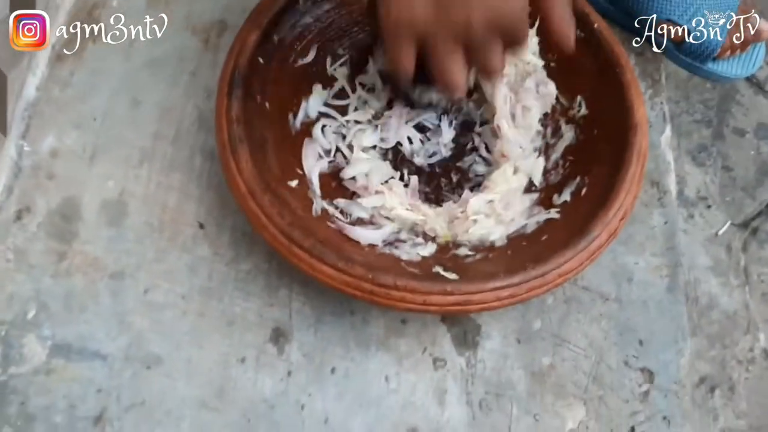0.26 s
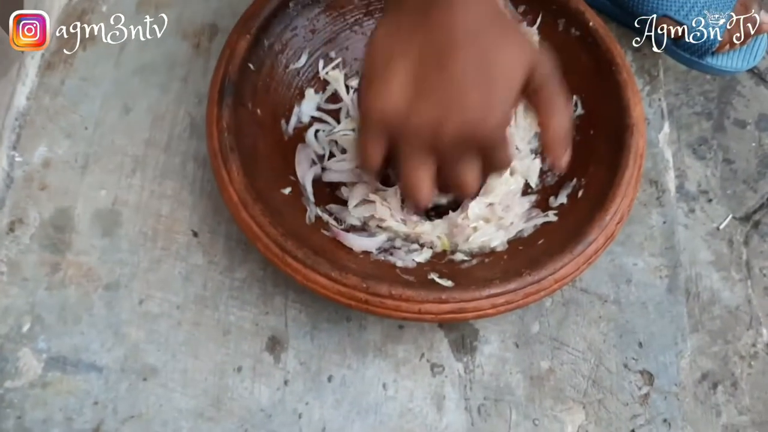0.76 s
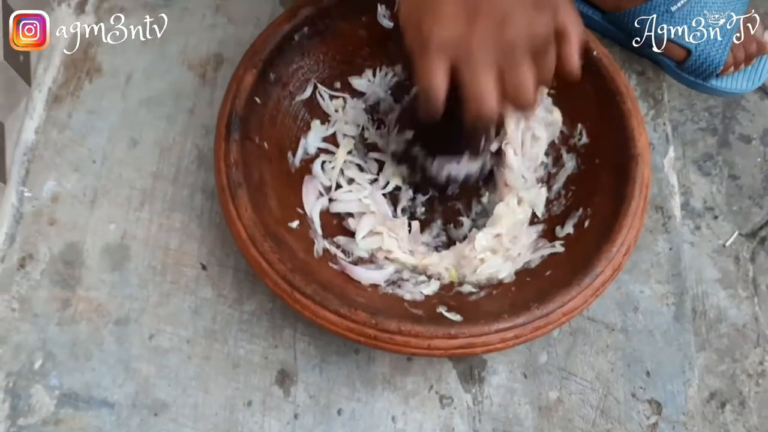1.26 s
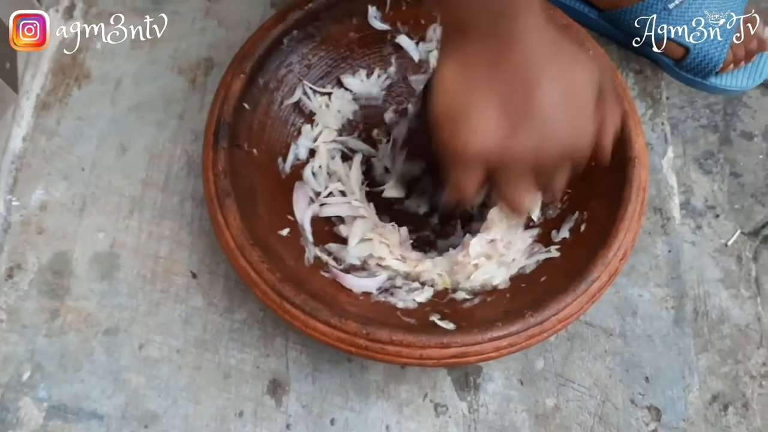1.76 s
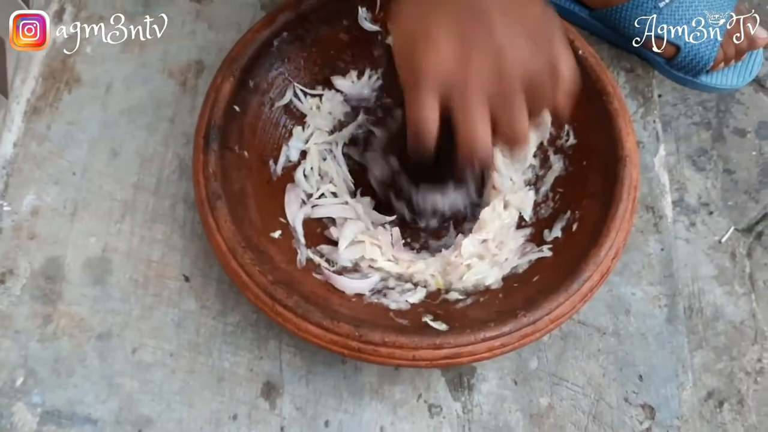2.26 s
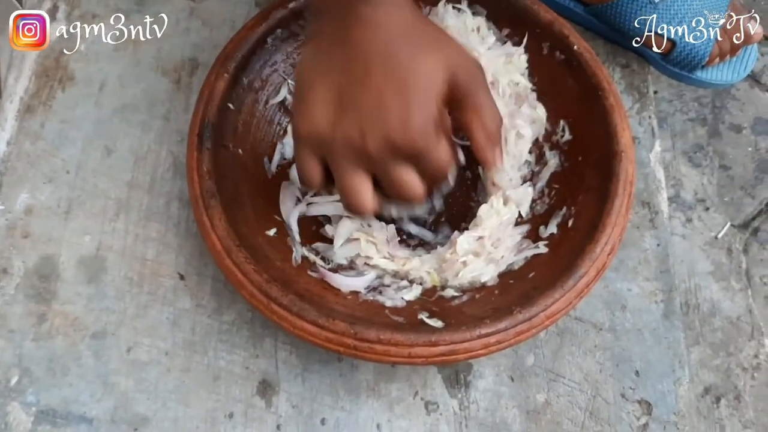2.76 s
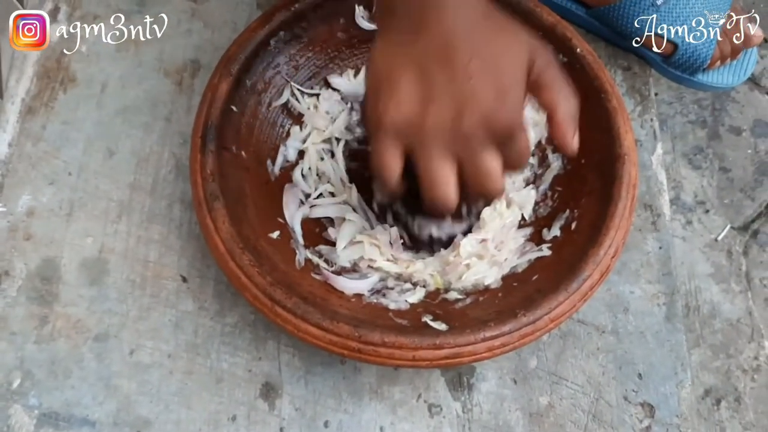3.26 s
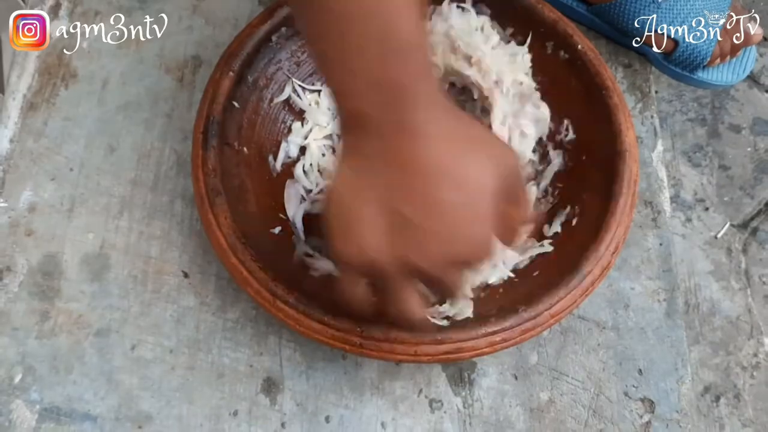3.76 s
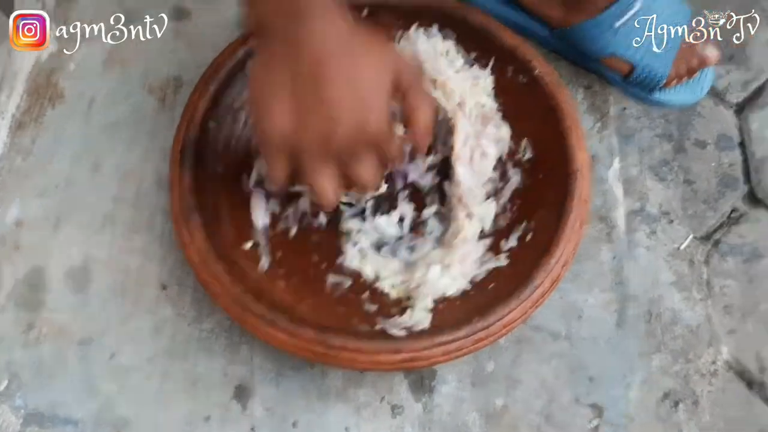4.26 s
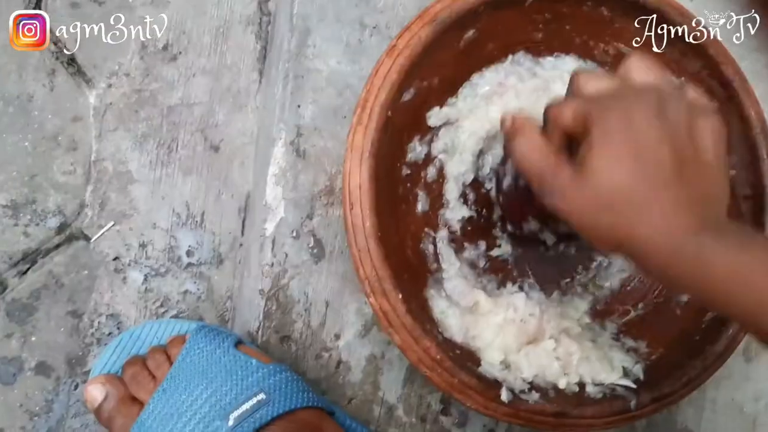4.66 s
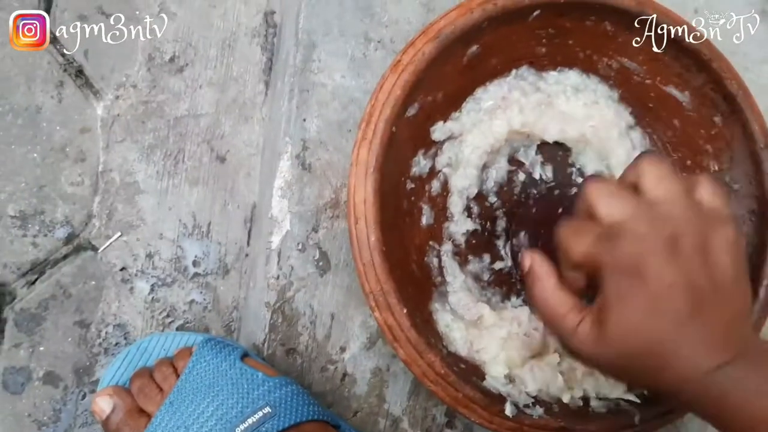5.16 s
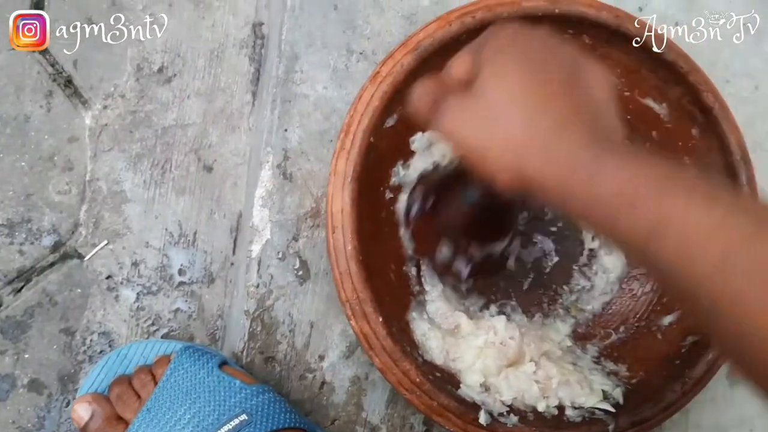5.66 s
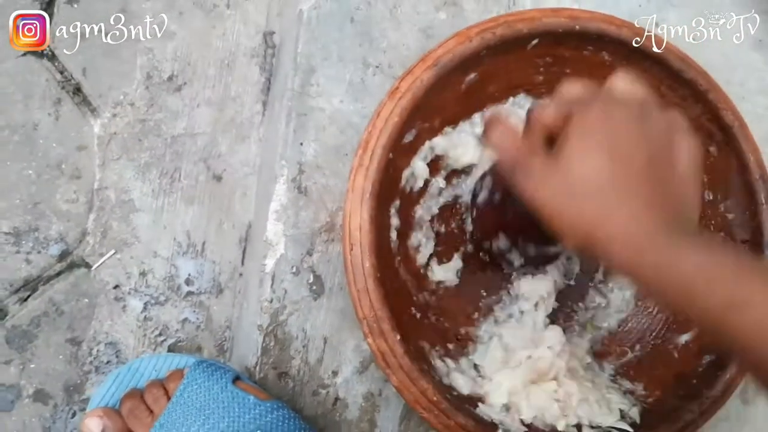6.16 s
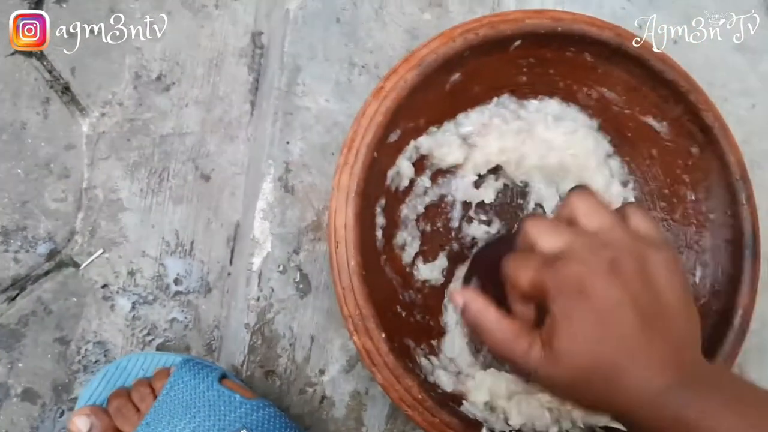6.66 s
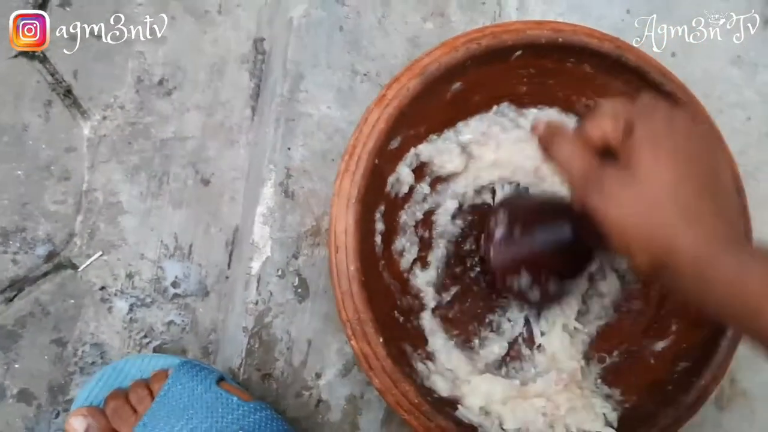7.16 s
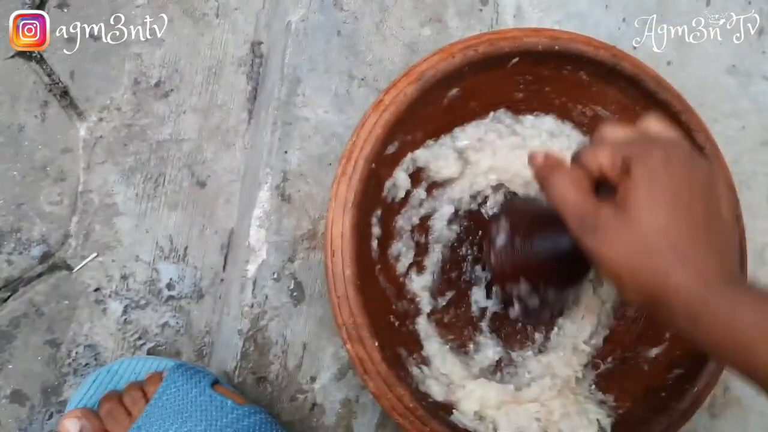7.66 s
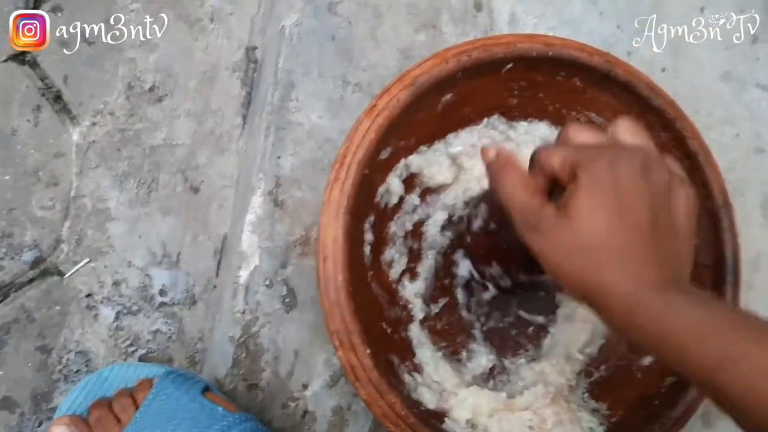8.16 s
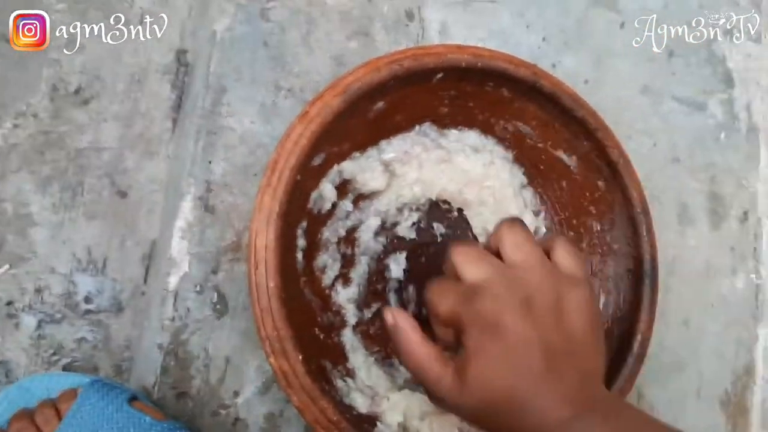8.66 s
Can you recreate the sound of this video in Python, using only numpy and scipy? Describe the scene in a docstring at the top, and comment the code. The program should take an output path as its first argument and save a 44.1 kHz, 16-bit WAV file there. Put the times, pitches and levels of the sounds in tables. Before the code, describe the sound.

Close outdoor grinding: a wooden pestle strikes a heavy grooved clay bowl in quick, uneven hollow knocks, many with a small double bounce. Between them it drags over the ridges with a gritty, crunchy scrape. Around the middle the sound cuts to wet paste, with slightly higher, shorter knocks, sharp snaps and thin spitting ticks. Very faint low air behind, dry, with a loose stereo spread.

```python
"""Hard, hollow knocks stand out throughout: a wooden pestle circles in a grooved clay bowl on concrete.
Every blow rings a few damped modes of the bowl and may bounce; the pestle also drags over the
grooves, heard as random grains coloured by clay and food, with snaps and low groans.
From 4.43 s the food is a wet paste that also spits. Faint air lies behind.
The right channel arrives a few ms early or late, and the offset jumps from stroke to stroke."""
import sys
import numpy as np
from scipy import signal
from scipy.fft import rfft, irfft, next_fast_len
from scipy.io import wavfile
from scipy.ndimage import uniform_filter1d

SR = 44100
rng = np.random.default_rng(int(sys.argv[2]) if len(sys.argv) > 2 else 0)


def unload_audio(sound):
    """Save the sound as a 16-bit wav file, at the path given as the first command line argument."""
    columns = np.transpose(np.atleast_2d(sound))
    # keep every value between -1 and 1, then stretch to whole-number steps
    steps = np.round(np.clip(columns, -1, 1) * 32767)
    wavfile.write(sys.argv[1], SR, steps.astype(np.int16))


def magnitude_from_level(level_db):
    """Linear magnitude for a level in decibels (20 dB per decade)."""
    exponent = np.asarray(level_db, float) / 20
    return 10 ** exponent


N = 393372
PASTE_FROM_S = 4.43  # chopped food before, wet paste after


def evened(x):
    """Normalisation: scales to rms 1."""
    return x / np.sqrt(np.mean(x ** 2) + 1e-20)


def colour(x, points):
    """Linear filtering: multiplies the spectrum by a curve through (Hz, dB) points."""
    hz, db = np.transpose(points)
    size = next_fast_len(x.shape[-1])
    f = np.fft.rfftfreq(size, 1 / SR)
    gain = magnitude_from_level(np.interp(np.log(f + 1), np.log(hz), db))
    return irfft(rfft(x, size) * gain, size)[..., :x.shape[-1]]


def add(mix, s, sound):
    """Superposition: mixes a sound in at s seconds."""
    part = mix[..., round(s * SR):][..., :sound.shape[-1]]
    part += sound[..., :part.shape[-1]]


def ring(modes, t):
    """Modal decay: after one blow each mode is a sine that dies away exponentially."""
    return sum(magnitude_from_level(db - 60 * t / t60) * np.sin(2 * np.pi * hz * t) for hz, db, t60 in modes)


# blows on the wall: start_s, peak_db (before the bass cut), pitch_hz (main mode under the hand's load),
# upper_db (other modes, before a common cut), right_late_ms (lag of the right channel)
BLOWS = [(0.017, -1, 336, 7, 8.5), (0.24, -1, 313, -3, 8), (0.332, 5, 324, 2, 8.5), (0.431, 3, 336, -6, 8),
         (0.531, -11.5, 286, 7, 7), (0.632, 4.5, 304, 2, 5.5), (0.75, -9.5, 270, -5, 6.5),
         (0.833, -6, 300, -3.5, 4), (0.953, 1.5, 298, 2, 4.5), (1.128, -16.5, 313, -6, 5),
         (1.246, -5, 339, -2, 2), (1.469, -8, 295, -3, -3.5), (1.759, -10.5, 320, -6, 3.5),
         (1.87, -3, 305, 3, 6), (2.096, -6.5, 312, -2.5, 2.05), (2.212, -4, 343, 1.5, 4.5),
         (2.394, -8, 332, -8, 1.5), (2.528, -3, 338, 0, 5), (2.724, -6.5, 328, -17, 2),
         (2.836, -6, 301, -5.5, -1), (3.053, -5.5, 318.5, -12.5, 3.5), (3.148, -12.5, 307, 2.5, 0.5),
         (3.344, -5.5, 306, -7, 11.5), (3.483, 3, 322, -5.5, 5), (3.66, -2.5, 314.6, -7, -2.5),
         (3.858, -12, 358, -9, 5), (3.892, 4, 306, -1.5, 5), (4.082, 7.5, 316, -4.5, 5.5),
         (4.603, -10, 383, -3, 4.5), (4.904, -10.5, 371, -5, 2.9), (5.197, -6, 377, 0.5, -2),
         (5.478, -9, 371, -4, -0.15), (5.783, -11, 389, -4, -1.5), (5.991, -20, 336, -14.5, 0.5),
         (6.141, -6.5, 372, -2, 5), (6.403, -11.5, 385, -5.5, 0.06), (6.66, -6.5, 396, -11, 2),
         (6.882, -9, 320, -3, 7.5), (6.948, -2, 376, -4.5, 0.17), (7.13, -18, 340, -15, 2),
         (7.242, -4, 379, -2.5, 0.73), (7.423, -6.5, 335, -14.5, 8), (7.538, -8.5, 373, -5, 2.5),
         (7.814, -9, 393, -2.5, 5), (8.108, -7.5, 370, -1.5, -2.5), (8.286, -17, 348, -17, 7.5),
         (8.405, -9, 386, 2, 4.5), (8.709, -7, 384, -4, 6)]
# landings after a blow, on the same loaded bowl: start_s, peak_db (before the bass cut)
BOUNCES = [(0.035, -3), (0.266, -2.5), (0.281, -10), (0.458, -2.5), (0.648, 2.5), (0.966, -8.5),
           (1.486, -4.5), (1.881, 6), (1.899, -4.5), (2.226, -11.5), (2.545, 1), (2.85, -0.5), (3.079, -23),
           (3.163, -5.5), (3.518, -17), (3.688, -13), (3.704, -3), (3.913, -3), (3.923, -1.5), (4.123, -5),
           (4.617, -10), (4.92, -19), (5.214, -2), (5.801, -4), (6.042, -4), (6.057, -4.5), (7.264, -12),
           (7.827, -10), (8.584, -26), (8.724, -16)]
# the other modes of the bowl: pitch_hz, level_db, t60_s
BOWL_MODES = [(269.3, -10, 0.2), (533.2, 0.5, 0.042), (603.6, -9, 0.062), (661, -11, 0.12), (748, -3, 0.06),
              (847, -6, 0.019), (1012, -17, 0.12), (1544, -12.5, 0.022), (1846, -5.5, 0.021)]


def knocks():
    """Impact excitation: soft wood pushes the wall for about a millisecond, then chatters; the bowl rings."""
    t, out = np.arange(SR // 5) / SR, np.zeros(N)
    blows = np.array(BLOWS)
    hits = [row[:2] for row in BLOWS] + BOUNCES
    spots = rng.standard_normal((len(hits), 3, len(BOWL_MODES)))
    chatter_shape = magnitude_from_level(-32 - 60 * t / 0.17) * np.minimum(t / 0.0083, 1)
    forces = rng.standard_normal((len(hits), len(t))) * chatter_shape
    forces[:, 0] = 1  # the first push
    for (s, db), (detune, share, side), force in zip(hits, spots, forces):
        latest = np.searchsorted(blows[:, 0], s, "right") - 1
        low_hz, upper_db = BLOWS[latest][2:4]
        damp = 0.7 if s > PASTE_FROM_S else 1  # paste deadens the main mode
        low = ring([(low_hz, 0, 0.099 * damp), (low_hz * 1.1, -13, 0.087 * damp)], t)
        low = low * (1 - np.exp(-t / 0.0017))  # the whole bowl needs a few ms to start rocking
        # each spot on the wall has its own mix, tuning and signs of the modes
        modes = [(np.sign(c) * hz * (1 + 0.02 * a), d + 2.5 * b, t60)
                 for (hz, d, t60), a, b, c in zip(BOWL_MODES, detune, share, side)]
        upper = magnitude_from_level(upper_db - 3.5) * ring(modes, t)
        push = np.hanning(round(0.00075 * magnitude_from_level(-0.2 * db) * SR) + 3)  # harder blows touch more briefly
        blow = signal.fftconvolve(low + upper, np.convolve(force, push))[:len(t)]
        add(out, s - 0.002, magnitude_from_level(db) * blow / abs(blow).max())  # 2 ms lead for the blow to build up
    # too small a body to radiate bass
    return signal.sosfilt(signal.butter(2, 200, "high", fs=SR, output="sos"), out)


# sweeps over the grooves: start_s, stop_s, start_grit_db, stop_grit_db, crackle_over_grit_db
# (levels before rise, squeeze and texture)
SWEEPS = [(0, 0.022, 2, -34.5, -2.5), (0.214, 0.353, -38.5, -33, -7), (0.425, 0.65, -38, -34.5, -10.5),
          (0.698, 0.954, -40.5, -35, -10.5), (1.044, 1.279, -39, -36.5, -6),
          (1.339, 1.595, -40.5, -33, -8.5), (1.664, 1.889, -43.5, -30.5, -9.5), (1.967, 2.2, -44, -33, -8),
          (2.297, 2.547, -39.5, -34, -11.5), (2.62, 2.872, -43.5, -34.5, -8),
          (2.915, 3.122, -47.5, -30.5, -10), (3.142, 3.262, -31.5, -49, -10.5),
          (3.245, 3.476, -47.5, -35.5, -6), (3.626, 3.934, -41.5, -40, -2.5),
          (4.055, 4.33, -45.5, -39, -5.5), (4.428, 4.636, -45.5, -32, -2.5), (4.705, 4.788, -48, -34.5, 0),
          (4.831, 4.933, -46.5, -29, -5), (5.002, 5.226, -39, -36, -3), (5.256, 5.484, -39, -33.5, -7.5),
          (5.562, 5.766, -43, -30, -10.5), (5.906, 6.145, -40.5, -32, -8.5), (6.199, 6.332, -47, -42.5, -3),
          (6.321, 6.417, -47.5, -34, -2.5), (6.554, 6.691, -42.5, -31, -7),
          (6.719, 6.969, -40.5, -31.5, -8.5), (7.022, 7.283, -41, -35, -4.5), (7.313, 7.43, -35.5, -33, -5),
          (7.42, 7.547, -31, -32, -7), (7.6, 7.736, -37.5, -32, -8.5), (7.784, 7.822, -35, -29, -1),
          (7.888, 7.99, -37.5, -33.5, -9), (7.993, 8.137, -44, -28.5, -8.5), (8.2, 8.315, -37, -35.5, -6.5),
          (8.35, 8.417, -53, -28, -6), (8.475, 8.584, -50.5, -32, -3), (8.58, 8.73, -47, -32.5, -4),
          (8.78, 8.93, -52, -30, -3)]
# the pestle's mere weight between sweeps, a row for grit and a row for crackle: level_db
REST_LEVELS = [
    [-56],
    [-59],
]


def pressure():
    """Friction follows load: grit and crackle swell along most sweeps, fade along a few, die away after."""
    grit_rise_s, grit_fall_db_per_s = 0.034, 262
    crackle_rise_s, crackle_fall_db_per_s = 0.033, 470
    t = np.arange(0, N + 64, 64) / SR
    power = magnitude_from_level(REST_LEVELS) ** 2
    for start, stop, start_db, stop_db, food_db in SWEEPS:
        since, after = np.maximum(t - start, 0), np.maximum(t - stop, 0)
        db = np.interp(t, [start, stop], [start_db, stop_db])
        grit = magnitude_from_level(db - grit_fall_db_per_s * after) * np.minimum(since / grit_rise_s, 1) ** 2
        # extra crackle as the food is squeezed against the wall towards the stop
        squeeze_db = 5.5 * np.exp(-np.maximum(stop - t, 0) / 0.17)
        food = magnitude_from_level(db + food_db + squeeze_db - crackle_fall_db_per_s * after)
        food = food * np.minimum(since / crackle_rise_s, 1) ** 2
        power = power + np.array([grit, food]) ** 2
    return [np.interp(np.arange(N) / SR, t, np.sqrt(p)) for p in power]


def grains(per_s, spread_db, clump_db, shared):
    """Shot noise: random clicks of uneven size in clumps of about 3 ms; the two ports share a part."""
    size_db = spread_db * np.minimum(rng.exponential(1, (3, N)), 4)
    size = magnitude_from_level(size_db) * rng.standard_normal((3, N))
    clicks = size * (rng.random((3, N)) < per_s / SR)
    clumps = evened(uniform_filter1d(rng.standard_normal(N), size=130))
    both = shared * clicks[0] + np.sqrt(1 - shared ** 2) * clicks[1:]
    return evened(both * magnitude_from_level(clump_db * clumps))


def patchy(x, db):
    """Spectral modulation: parts of the spectrum swell and fade as the pestle meets other clay and food."""
    z = signal.stft(x, nperseg=512)[2]
    patches = uniform_filter1d(rng.standard_normal(z.shape[1:]), 5, 0)
    patches = uniform_filter1d(patches, 7, 1)
    return signal.istft(z * magnitude_from_level(db * evened(patches)), nperseg=512)[1][:, :N]


# colour of the grit in chopped food, then in paste: pitch_hz, level_db (per Hz, relative)
GRIT_CHOPPED = [(45, -13), (150, -1), (320, -0.5), (500, -9), (1200, -22), (1700, -5.5), (2300, -7),
                (4500, -17), (6000, -24.5)]
GRIT_PASTE = [(45, -12), (150, 0.5), (350, 7), (550, -4), (1100, -5), (1800, -0.5), (2700, -1),
              (4500, -14.5), (6000, -19)]
# colour of crackling food, in drag and snaps: pitch_hz, level_db (per Hz, relative)
CRACKLE = [(3000, -3), (5000, 5.5), (7800, 2.5), (9800, -5.5), (11600, -0.5), (13500, -7), (16000, -41)]


def drag():
    """Source and resonator: grit excites the clay and its top modes; the food crackles above it."""
    on_grit, on_food = pressure()
    t = np.arange(N) / SR
    grit = grains(per_s=4500, spread_db=1.5, clump_db=2.5, shared=0.66)
    top_ring = ring(BOWL_MODES[-2:], t[:SR // 8])
    sung = evened(signal.oaconvolve(grit, top_ring[None], axes=1)[:, :N])
    chopped = magnitude_from_level(4) * evened(colour(grit, GRIT_CHOPPED)) + magnitude_from_level(-0.5) * sung
    paste = magnitude_from_level(5) * evened(colour(grit, GRIT_PASTE))
    rub = patchy(np.where(t < PASTE_FROM_S, chopped, paste), db=2.5)
    food = colour(grains(per_s=3000, spread_db=3.5, clump_db=4.5, shared=0.76), CRACKLE)
    paste_top = colour(food, [(9000, -34), (13500, 6.5)]) * (t > PASTE_FROM_S)  # paste spits higher
    food = patchy(evened(food + paste_top), db=2.2)
    return rub * on_grit + food * on_food


# single snaps of food: start_s, level_db (rms of the burst before it fades),
# treble_over_middle_db, length_ms (time to fall 14 dB)
SNAPS = [(0.652, -19, 3, 6.6), (0.815, -25.5, 23, 6.8), (1.572, -25.5, 27, 13), (2.498, -26.5, 20, 16),
         (1.2584, -20.5, 2, 5.9), (4.241, -24, -8, 17), (0.915, -19.5, 13, 4.2), (2.439, -17.5, -27, 5.5),
         (3.844, -16.5, -34, 5.1), (4.604, -15.5, 29, 15), (4.912, -18.5, -1, 13), (5.212, -12.5, 30, 7.8),
         (5.799, -16, -12, 14), (6.138, -5.5, -31, 9.8), (6.944, -13.5, 12, 5.1), (7.147, -16.5, -33, 4),
         (7.256, -5, 25, 6.8), (7.541, -18.5, 4, 8.1), (8.425, -13.5, 2, 4.4)]


def snaps():
    """Brittle fracture: a short burst made of a clack at two tones of the clay and a treble spit."""
    out, t = np.zeros(N), np.arange(2048) / SR
    clay = [(1800, -42), (2650, -15.5), (3050, -22), (3450, -15.5), (4500, -44)]
    for (s, db, treble_db, ms), noise in zip(SNAPS, rng.standard_normal((len(SNAPS), 2048))):
        middle = evened(colour(noise, clay))
        spit = colour(noise, CRACKLE)
        spit = spit + (s > PASTE_FROM_S) * colour(spit, [(9000, -4), (12500, 6)])  # paste spits higher
        burst = middle + magnitude_from_level(treble_db) * evened(spit)
        fading_db = -14 * t * 1000 / ms
        add(out, s, magnitude_from_level(db + fading_db) * burst / burst.std() * np.minimum(t / 0.00005, 1))
    return out


# thin spits of paste: start_s, level_db (before a common 1 dB cut, rise and decay)
SPITS = [(4.5845, -9), (4.884, -9.5), (5.0667, -13.5), (5.1782, -10), (5.7417, -15.5), (5.8832, -13.5),
         (6.304, -11), (6.6703, -13), (7.7803, -18), (7.8177, -17), (8.256, -14.5), (8.408, -17),
         (8.6938, -11.5)]


def spits():
    """Bubble burst: paste gives way in a click of a few ms, brightest at the top."""
    out, t = np.zeros(N), np.arange(1024) / SR
    for (s, db), noise in zip(SPITS, rng.standard_normal((len(SPITS), 1024))):
        burst = evened(colour(noise, [(1500, -9), (5000, -8), (10000, -10.5), (13000, 0.5)]))
        add(out, s, magnitude_from_level(db - 1 - 60 * t / 0.025) * burst * np.minimum(t / 0.0013, 1))
    return out


# low shudders: start_s, length_s, peak_db, from_hz, to_hz
GROANS = [(0.298, 0.07, -21, 110, 45), (1.206, 0.2, -35.5, 100.5, 88), (1.493, 0.118, -30, 130, 45),
          (2.743, 0.057, -28, 132, 55)]


def groans():
    """Frequency glide: a low shudder sinks in pitch as the stroke slows."""
    out = np.zeros(N)
    for s, length, db, from_hz, to_hz in GROANS:
        hz = np.geomspace(from_hz, to_hz, round(length * SR))
        phase = 2 * np.pi * np.cumsum(hz) / SR
        add(out, s, magnitude_from_level(db) * np.sin(phase) * np.hanning(len(hz)))
    return out


def air():
    """Diffuse noise: faint open air, mostly bass and independent at the two ports."""
    noise = rng.standard_normal((2, N))
    rumble = evened(colour(noise, [(25, -73), (60, 7), (1000, -10), (16000, -79)]))
    level_db = np.where(np.arange(N) / SR < PASTE_FROM_S, -42.5, -46.5)  # more rumble at first
    return magnitude_from_level(level_db) * rumble


def scene():
    """Superposition of all sources at both ports."""
    return knocks() + drag() + snaps() + spits() + groans() + air()


def stroke_at(t):
    """Event lookup: row of the blow under way, counted from 20 ms before its start."""
    starts = np.array(BLOWS)[:, 0] - 0.02
    return np.maximum(np.searchsorted(starts, t) - 1, 0)


# tone of the right port: pitch_hz, gain_db
RIGHT_TONE = [(60, -1.5), (300, 0.5), (1300, -5.5), (2400, -7), (4400, -3), (8000, -4.5), (15000, -9)]


def right_port(sound):
    """Time delay and coherence: the right channel is duller and slips in time, while part of its treble above 6
    kHz does not slip."""
    n = np.arange(N)
    early_tone = colour(sound, [(900, -2.5), (3000, 4)])  # brighter until the paste
    right = colour(np.where(n / SR < PASTE_FROM_S, early_tone, sound), RIGHT_TONE)
    late_ms = uniform_filter1d(np.array(BLOWS)[stroke_at(n / SR), 4], 300)
    late = np.round(late_ms * SR / 1000).astype(int)
    slipped = right[np.clip(n - late, 0, N - 1)]
    treble = [(5800, -60), (6400, 0)]
    common = 0.75  # gain of the treble that does not slip
    slipped_loss = 1 - np.sqrt(1 - common ** 2)
    return slipped + common * colour(right, treble) - slipped_loss * colour(slipped, treble)


def low_pass(x):
    """Removes everything above the highest recorded frequency."""
    return signal.sosfilt(signal.butter(12, 16000, fs=SR, output="sos"), x)


def record(dry):
    """Soft saturation: peaks of both ports bend smoothly into the ceiling."""
    x = np.array([dry[0], right_port(dry[1])])
    limited = x / (1 + abs(x) ** 10) ** (1 / 10)
    return low_pass(limited)


dry = scene()
out = record(dry)
unload_audio(out)
```